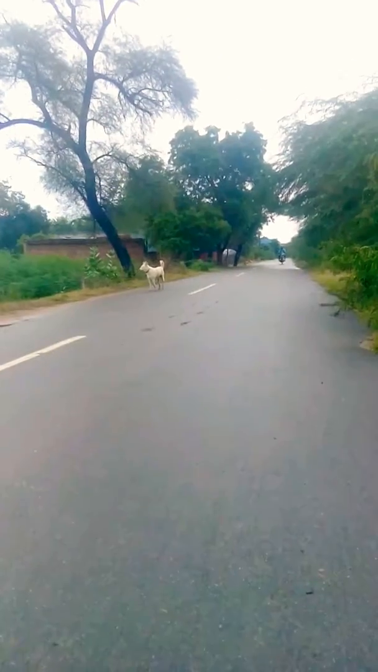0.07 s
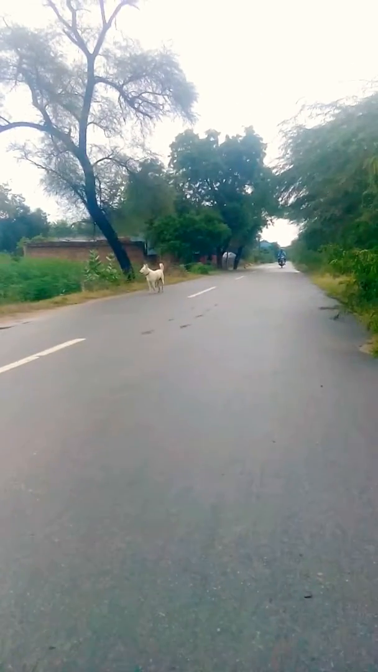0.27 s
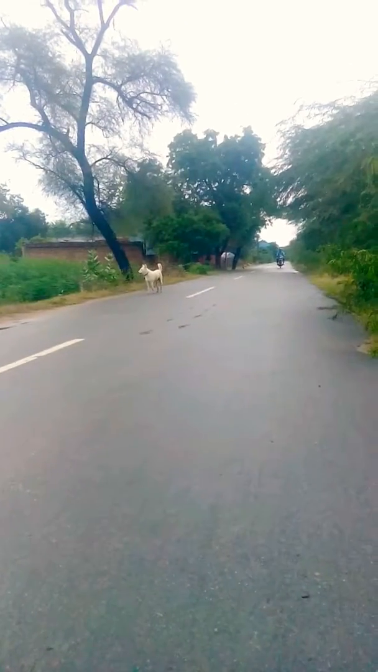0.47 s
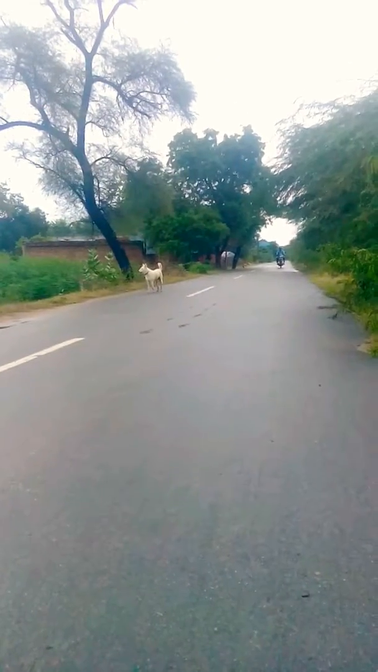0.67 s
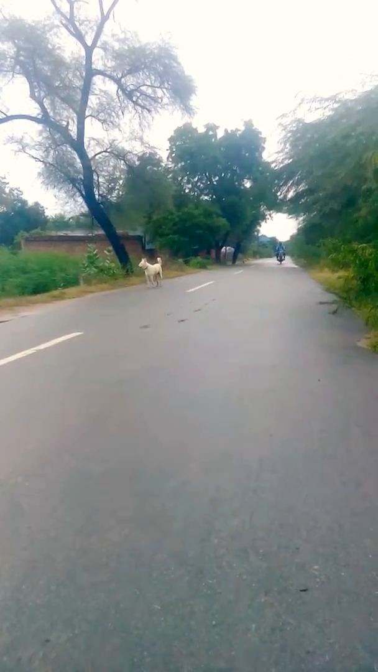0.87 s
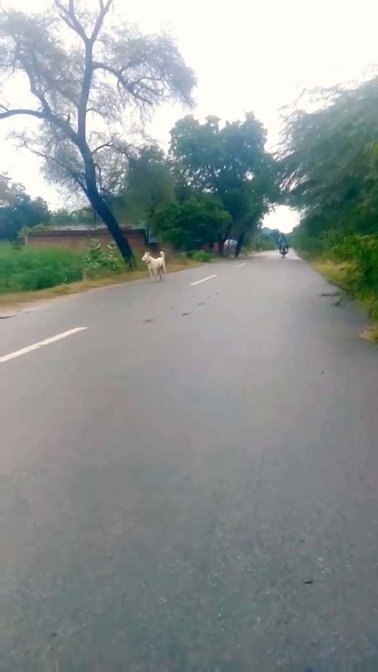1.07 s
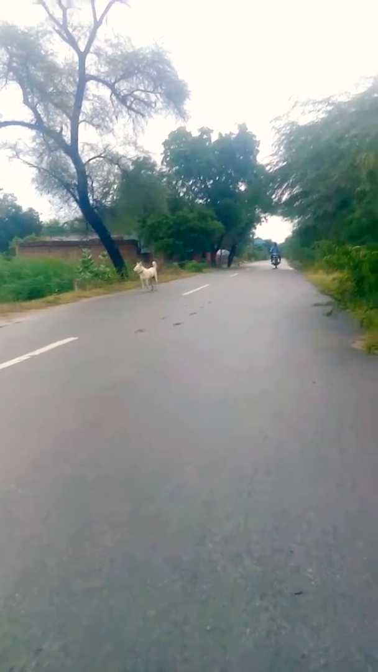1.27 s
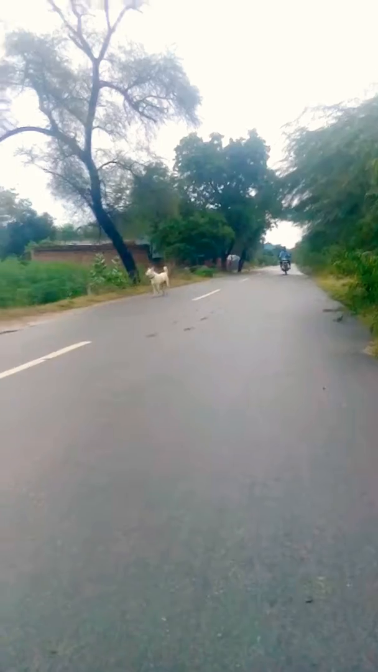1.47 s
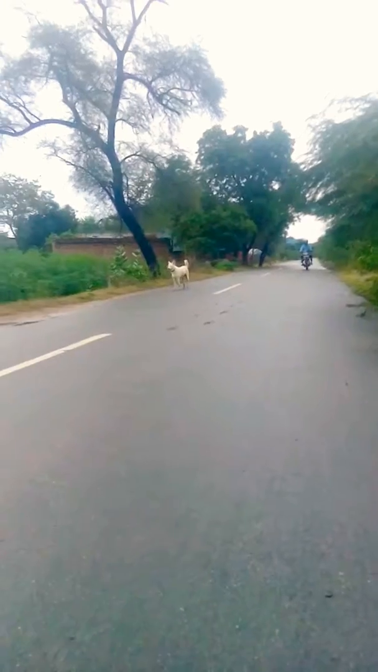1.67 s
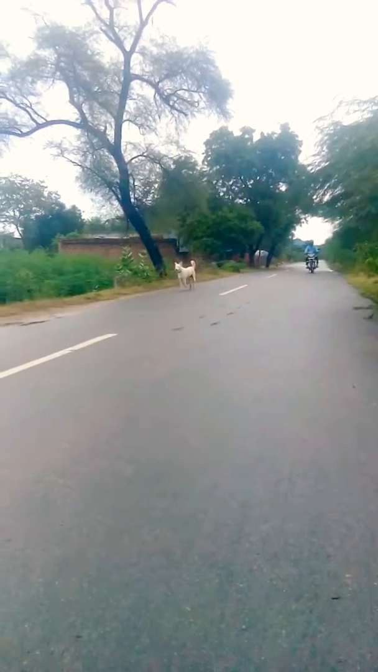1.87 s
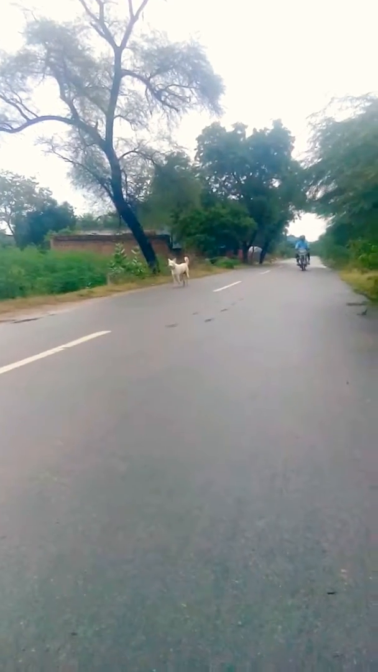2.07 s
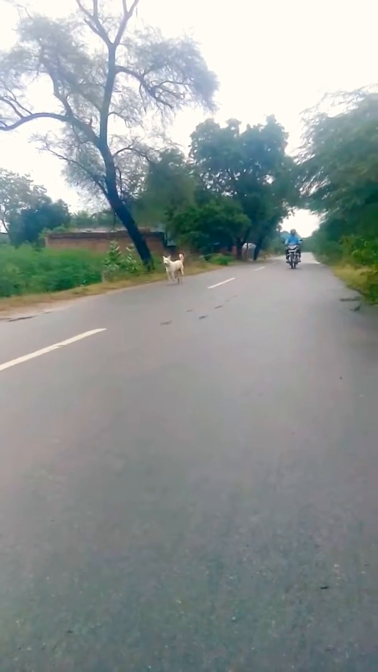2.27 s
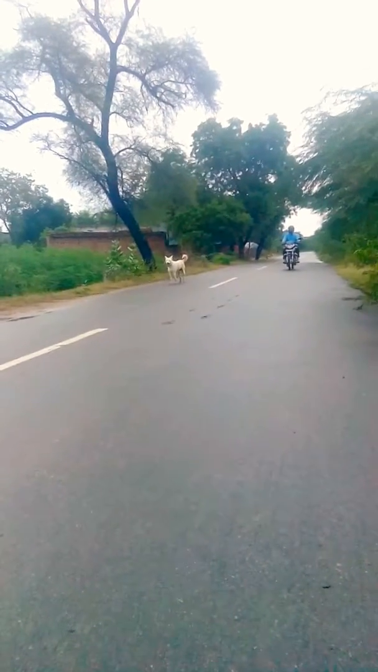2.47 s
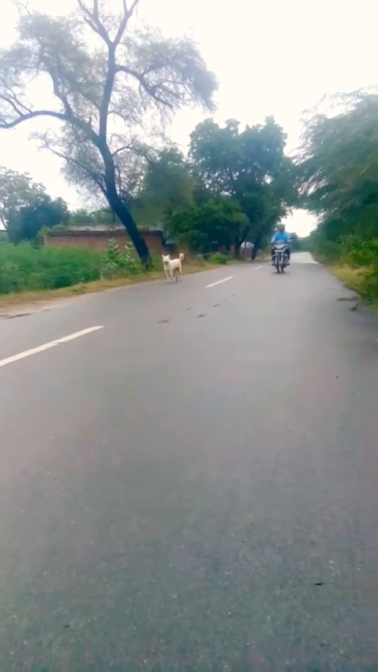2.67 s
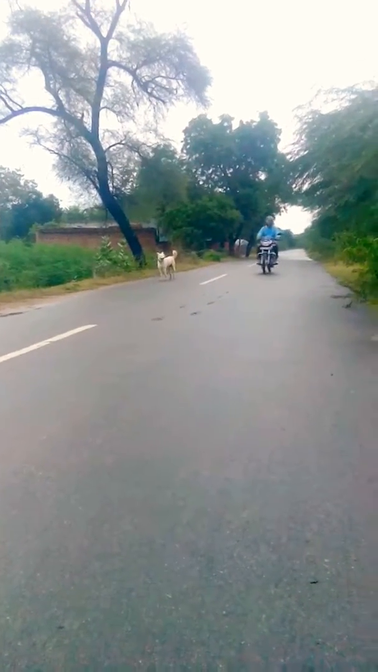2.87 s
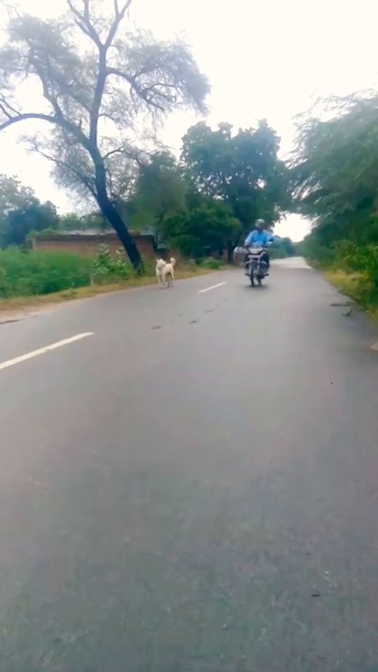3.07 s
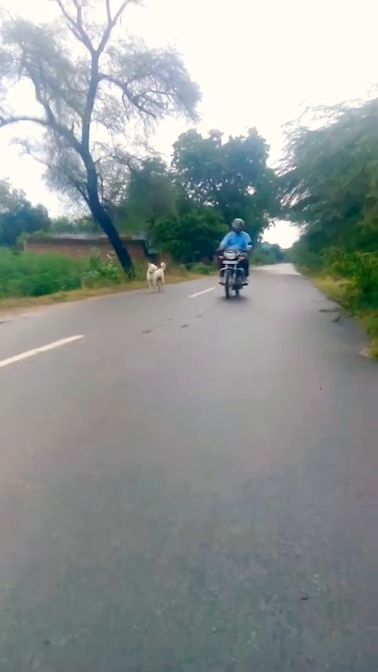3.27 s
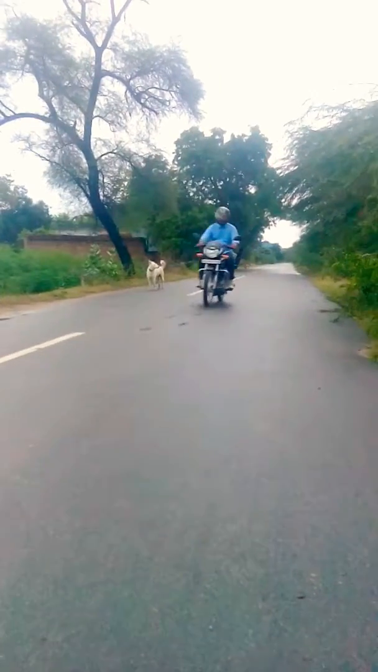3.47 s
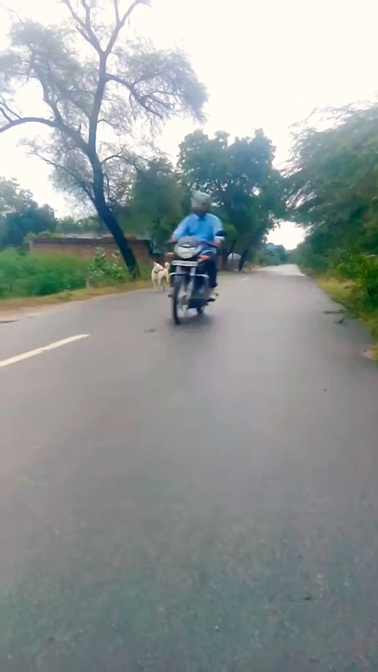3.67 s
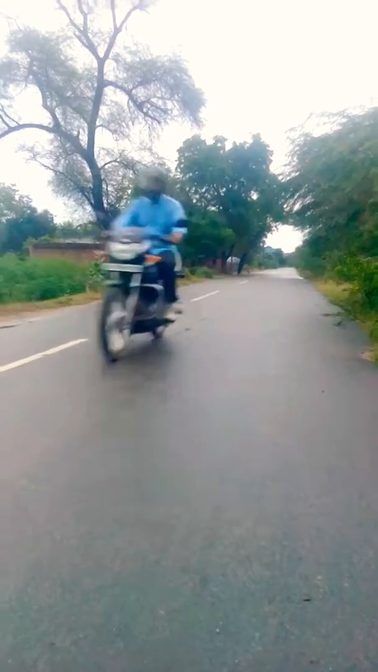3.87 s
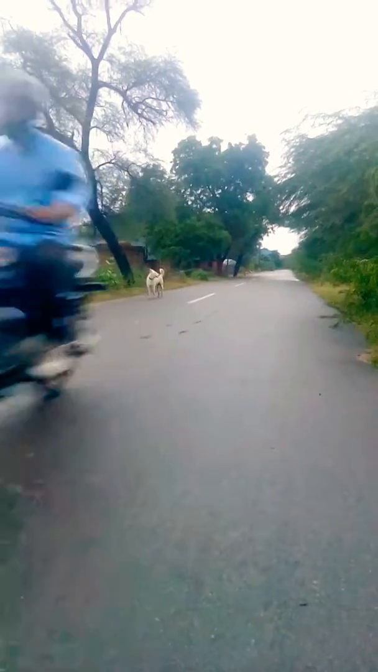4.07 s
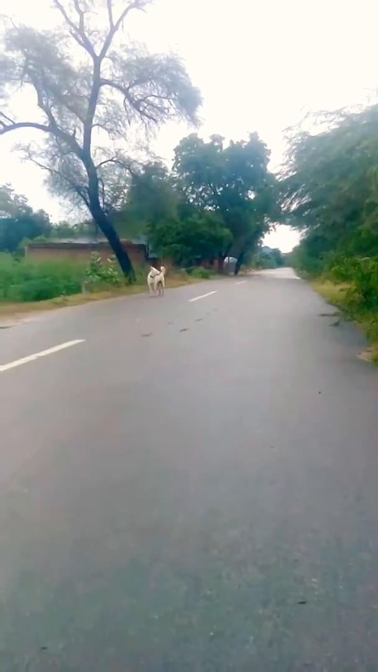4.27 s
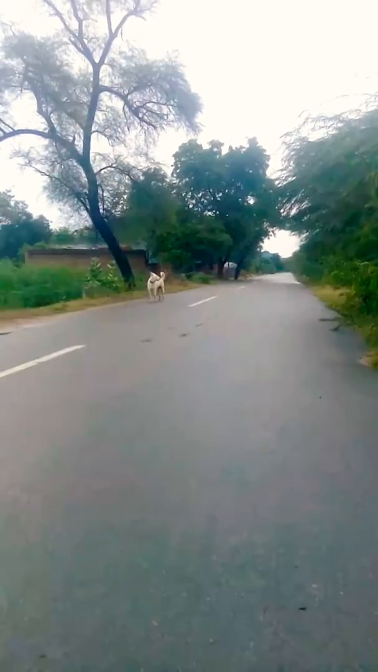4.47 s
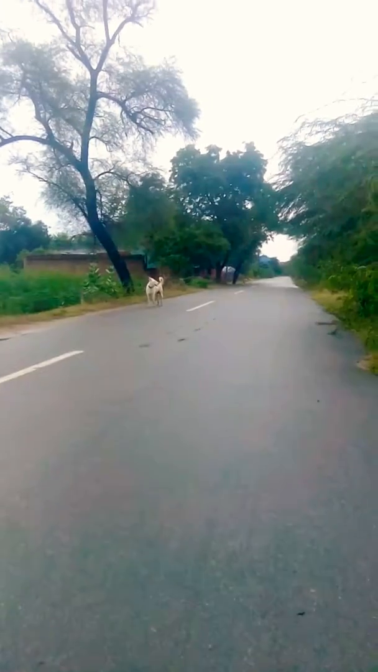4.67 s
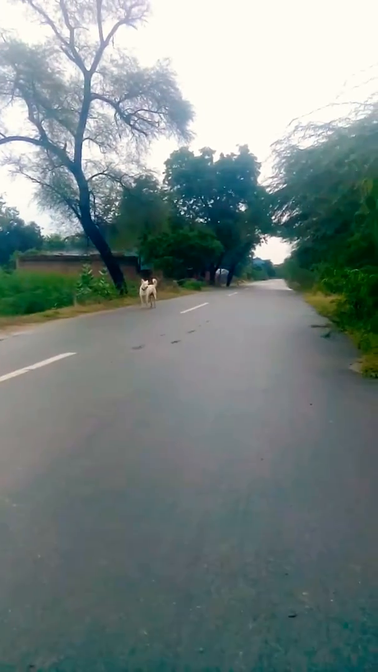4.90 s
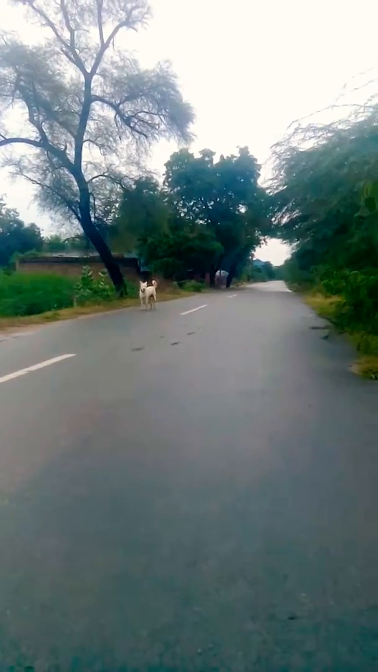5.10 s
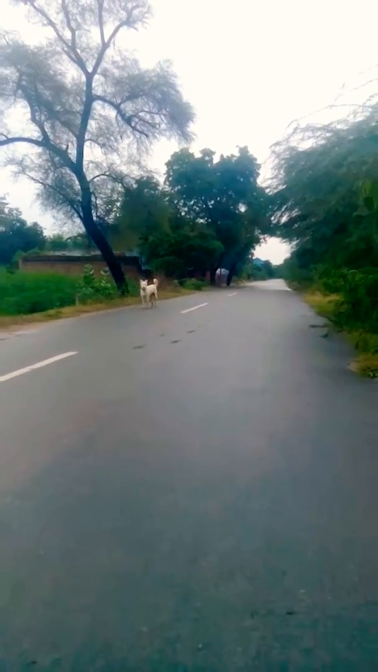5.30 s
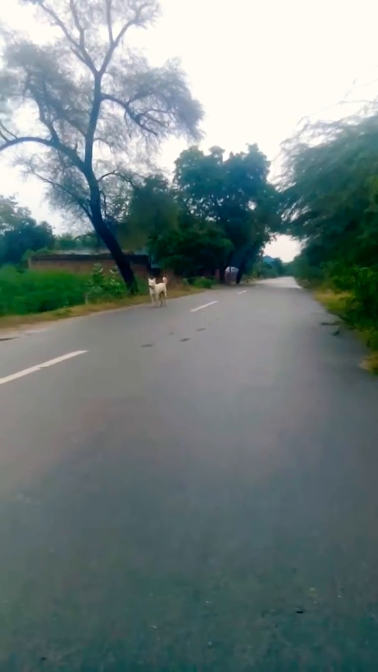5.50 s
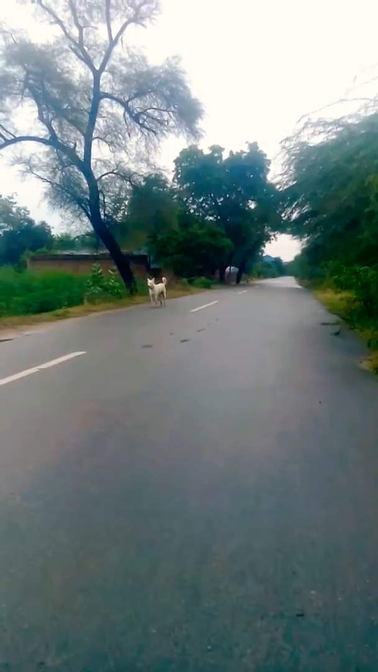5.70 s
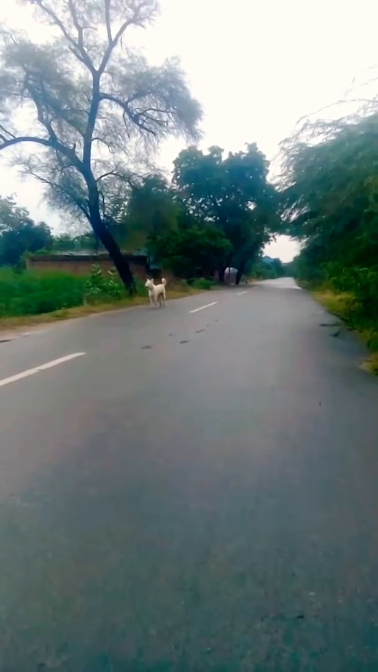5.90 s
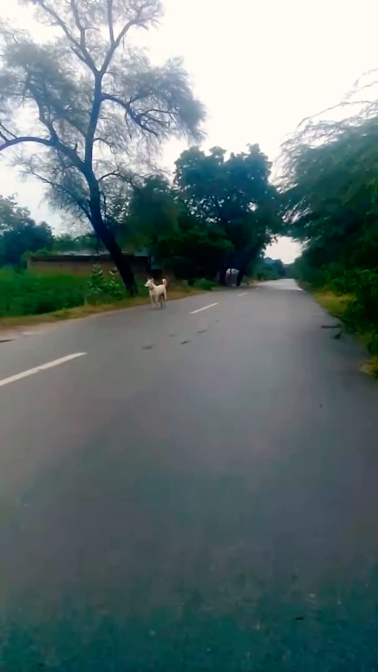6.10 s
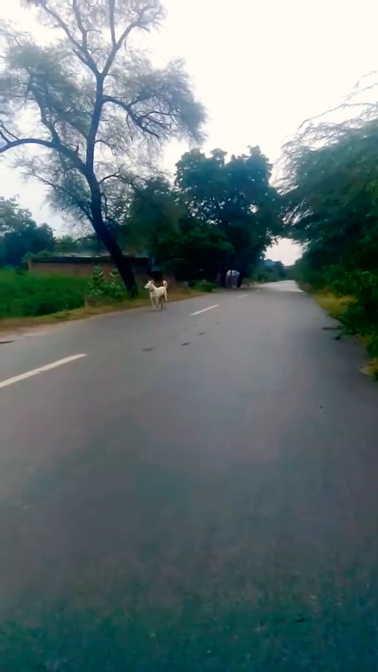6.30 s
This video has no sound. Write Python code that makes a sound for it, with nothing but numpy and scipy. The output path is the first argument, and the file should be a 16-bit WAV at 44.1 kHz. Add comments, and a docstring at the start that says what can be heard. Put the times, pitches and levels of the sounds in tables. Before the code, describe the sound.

A motorcycle putters up a quiet country road, passes close by and draws away, with small birds chirping faintly behind it.

```python
"""A motorcycle passes on a country road

A single-cylinder motorcycle rolls up, passes close by and draws away, easing off with one pop at the end.
Each firing sends a puff of gas that rings the exhaust pipes. Engine clatter and tyre roar change colour
as first the front, then the side, then the rear faces us. Behind it are leaves, insects and a breeze;
small birds in the hedges and a far dove sing in gliding pure tones."""
import sys
import numpy as np
from scipy import signal
from scipy.fft import rfft, irfft, next_fast_len
from scipy.io import wavfile

SR = 44100
rng = np.random.default_rng(int(sys.argv[2]) if len(sys.argv) > 2 else 0)


def pcm_store(signal):
    """Save signal as 16-bit PCM."""
    levels = np.round(np.clip(np.atleast_2d(signal), -1, 1) * 32767)
    wavfile.write(sys.argv[1], SR, levels.astype(np.int16).T)


N = 279770
SPEED_M_S, SOUND_M_S = 7.4, 343
PASS_S, NEAREST_M = 4.4797, 1.135   # when and how close the motorcycle passes
EASE_OFF_S, EASING_S = 5.82, .35   # when the throttle starts to close, and how long it takes


def from_db(db):
    """Turn decibels into a number to multiply by."""
    return 10 ** (np.asarray(db) / 20)


def rms_one(x):
    """Scale a sound so that its average strength (rms) is 1."""
    return x / np.sqrt(np.mean(x ** 2) + 1e-20)


def drift(per_s):
    """A wandering value: random points of spread 1, joined by straight lines."""
    points = rng.standard_normal(1000)
    return np.interp(np.arange(N) / SR * np.clip(per_s, .1, 150), np.arange(1000), points)


def resonate(x, hz, width_hz):
    """Make a sound ring at one pitch; a smaller width rings longer."""
    r = np.exp(-np.pi * width_hz / SR)
    feedback = [1, -2 * r * np.cos(2 * np.pi * hz / SR), r * r]
    return signal.lfilter([(1 - r * r) / 2, 0, (r * r - 1) / 2], feedback, x)


def coloured(spectrum):
    """Noise of strength 1, shaped by (f/Hz, level/dB) points and silent below the first."""
    size = next_fast_len(N)
    hz, db = np.transpose(spectrum)
    bin_hz = np.arange(size // 2 + 1) * SR / size
    gain = from_db(np.interp(np.log(bin_hz + 1), np.log(hz), db, left=-150))
    return rms_one(irfft(rfft(rng.standard_normal(size)) * gain, size)[:N])


def passage(behind_m=0):
    """Time, distance and viewing angle (degrees, 0 = head on) of a point on the moving motorcycle."""
    t = np.arange(N) / SR
    ahead_m = SPEED_M_S * (PASS_S - t) + behind_m
    return t, np.hypot(ahead_m, NEAREST_M), np.degrees(np.arctan2(NEAREST_M, ahead_m))


def beam(aim_deg, width_deg, db, far_db, coasting_db, behind_m=0):
    """Gain of a part that beams its sound like a torch: strongest when near and aimed at us."""
    t, metres, angle = passage(behind_m)
    far = np.clip((metres - 24.4) / 3.7 + .5, 0, 1)   # beyond about 24 m the sound is duller
    coasting = np.sqrt(np.clip((t - EASE_OFF_S) / EASING_S, 0, 1))   # sudden at first
    off_aim = np.abs((angle - aim_deg) / width_deg)
    beam_db = np.maximum(-6 * off_aim ** 3.24, -29.5)   # a little leaks round the back
    return from_db(db + beam_db + far_db * far + coasting_db * coasting) / metres


# The hiss of the fields: f/Hz, relative level/dB
FIELD_SPECTRUM = [(180, -39), (300, -29), (446, -16), (543, -3), (651, -11), (967, -2.5), (1720, -8),
                  (3120, -3.5), (4330, -8), (5920, -12), (6990, -54.5), (8950, -24), (15400, -144)]
def fields():
    """Leaves and insects make a soft hiss that wavers a little."""
    return from_db(-57.5 + 1.5 * drift(5.5)) * coloured(FIELD_SPECTRUM)


# The rumble of moving air: f/Hz, relative level/dB
WIND_SPECTRUM = [(8, -17.5), (27, 18), (42, -6), (60, -17), (90, -60)]
def wind(breeze_db=-79.5, draught_db=-46):
    """A faint breeze, plus the air the motorcycle pushes, which swells as it comes near."""
    metres = passage()[1]
    return (from_db(breeze_db) + from_db(draught_db) / metres) * coloured(WIND_SPECTRUM)


def sing(notes):
    """Each bird note is a pure tone gliding through three pitches; the hedges add two echoes."""
    song = np.zeros(N + SR)
    for s, length, start_hz, middle_hz, end_hz, db in notes:
        u = np.linspace(-1, 1, int(length * SR))   # from the note's start to its end
        hz = middle_hz + (end_hz - start_hz) / 2 * u + ((start_hz + end_hz) / 2 - middle_hz) * u ** 2
        fade = np.sqrt(2 - 2 * u ** 4)
        song[round(s * SR):][:len(u)] += from_db(db) * fade * np.sin(2 * np.pi * np.cumsum(hz) / SR)
    song[:N] *= from_db(4 * drift(140))   # leaves in the way make the notes scratchy
    echoes = 0.36 * np.roll(song, round(.017 * SR)) + 0.33 * np.roll(song, round(.037 * SR))
    return (song + echoes)[:N]


def far_chatter(count=120, db=-65):
    """Far birds, too many to tell apart: tiny chirps at random times and pitches."""
    notes = []
    for when, length, pitch, bend, fall, loud in rng.random((count, 6)):
        hz = 2200 * 2.1 ** pitch
        glide = hz, hz * (1 + 0.28 * bend), hz * (0.85 + 0.17 * fall)
        notes.append((when * N / SR, 0.0066 + 0.019 * length, *glide, db + 8 * (loud - .5)))
    return sing(notes)


# The dove's coos: t/s, length/s, level/dB
COOS = [(0, 0.25, -69.5), (.57, 0.13, -64), (1.35, 0.17, -60.5), (1.72, 0.33, -64.5), (2.449, .17, -61)]
def dove(glide_hz=(546, 543, 515)):
    """A far dove sings low notes that sag at the end."""
    return sing((s, length, *glide_hz, db) for s, length, db in COOS)


# Whistled notes: t/s, length/s, start f/Hz, middle f/Hz, end f/Hz, level/dB
WHISTLES = [(1.006, 0.033, 2230, 2200, 2060, -59), (1.3, 0.056, 2570, 2540, 2450, -62),
            (1.81, 0.078, 2780, 2460, 2380, -56.5), (2.071, .02, 2550, 2445, 2450, -54.5),
            (2.195, .02, 2830, 2840, 2700, -53), (2.37, 0.05, 2780, 2500, 2400, -60),
            (2.929, 0.072, 2740, 2450, 2340, -53), (6.034, 0.037, 2090, 2230, 1930, -52.5),
            (6.062, 0.044, 2050, 2150, 1790, -53.5), (6.115, 0.054, 2040, 2340, 1920, -57.5)]
def whistling_birds():
    """Small birds whistle short notes, each one smooth glide."""
    return sing(WHISTLES)


# Warbled phrases: t/s, length/s, first f/Hz, last f/Hz, swing/share of the pitch, level/dB
WARBLES = [(0.265, .017, 2650, 2660, .06, -55.5), (.282, 0.037, 4600, 2730, 0.082, -51),
           (0.334, 0.04, 4300, 2210, 0.124, -50), (0.426, 0.012, 5700, 5700, 0.032, -64),
           (0.497, .015, 5670, 5720, 0.048, -64), (0.838, .07, 2470, 2660, 0.13, -59),
           (1.555, .02, 5100, 5100, .07, -57), (1.843, .02, 5620, 5700, 0.043, -62),
           (2.43, .02, 5300, 5300, 0.074, -58), (2.465, 0.058, 2980, 3900, 0.091, -53),
           (2.578, 0.11, 3700, 3300, 0.19, -49), (2.696, .035, 3290, 3390, 0.053, -50.5),
           (2.87, .018, 3510, 3470, 0.046, -52.5), (5.494, .145, 3700, 3680, 0.092, -48.5),
           (5.893, .025, 3580, 3600, .04, -53), (5.956, 0.033, 3620, 3500, 0.091, -52),
           (6.072, 0.052, 4780, 5400, .09, -62), (6.095, .055, 3530, 3280, 0.11, -57.5),
           (6.287, .05, 3220, 2960, 0.14, -53)]
def warbling_birds(step_s=.0135):
    """Each phrase is a ragged run of quick notes; most arch up in pitch, some dip."""
    notes = []
    for s, length, first_hz, last_hz, swing, db in WARBLES:
        draws = rng.uniform(-1, 1, (16, 5))[:int(np.ceil(length / step_s))]
        for k, (pitch, lean, arch, stretch, loud) in enumerate(draws):
            hz = first_hz + (last_hz - first_hz) * k * step_s / length
            hz *= 1 + 0.96 * swing * pitch
            tilt, bend = 0.82 * swing * lean, swing * np.sign(arch + .4)
            glide = hz * (1 - bend - tilt), hz * (1 + bend), hz * (1 - bend + tilt)
            notes.append((s + k * step_s, (1.13 + .4 * stretch) * step_s, *glide, db + loud))
    return sing(notes)


# Dry ticks: t/s, level before filtering/dB
DRY_TICKS = [(2.784, -54), (5.544, -56)]
def ticks():
    """Each tick is a tiny burst of bright noise."""
    out, t = np.zeros(N), np.arange(round(.03 * SR)) / SR
    for s, db in DRY_TICKS:
        out[round(s * SR):][:len(t)] += from_db(db) * np.exp(-t / 0.00067) * rng.standard_normal(len(t))
    return resonate(out, hz=5500, width_hz=4000)


# Pings from the engine: t/s, f/Hz, time to fade by 60 dB/s, peak level/dB
METAL_PINGS = [(3.45, 4300, .04, -42), (3.712, 4150, .04, -36), (4.3096, 3500, .014, -10),
               (4.578, 4050, .04, -16)]
def pings():
    """Engine metal rings with a pure tone that starts fast and dies away."""
    out, t = np.zeros(N), np.arange(round(.03 * SR)) / SR
    for s, hz, fade_s, db in METAL_PINGS:
        level = from_db(db - 60 * t / fade_s) * np.minimum(t / .0004, 1)
        out[round(s * SR):][:len(t)] += level * np.sin(2 * np.pi * hz * t)
    return out


def backfire(at_s=6.2495, db=-24):
    """One sharp exhaust pop: a short dip in air pressure between two crests."""
    u = (np.arange(N) / SR - at_s - .003) / .0011
    return from_db(db) * (u ** 2 - 1) * np.exp(-u ** 2 / 2)


# Engine speed: t/s at the motorcycle, firing rate f/Hz
FIRING_RATE = [(-0.2, 39.22), (0.5, 37.67), (1.0, 36.87), (1.25, 37.46), (1.75, 36.42), (2.4, 35.65),
               (2.8, 35.69), (3.4, 34.78), (4.2, 34.74), (4.55, 35.28), (4.9, 34.46), (5.4, 35.09),
               (5.75, 35.04), (6.1, 33.79), (6.5, 32.69)]
def firing_cycles():
    """Count engine cycles as they reach us; the travel time shrinks, then grows, so the pitch drops."""
    t, metres, _ = passage()
    sent_s = t - metres / SOUND_M_S
    firing_hz = np.interp(sent_s, *np.transpose(FIRING_RATE))
    return .24 + np.cumsum(firing_hz * np.gradient(sent_s))   # starts partway through a cycle


def valve(cycles, hz=4170, fade_s=0.017):
    """A valve taps shut twice a cycle with uneven force, so now and then it rings out."""
    taps = np.diff(np.floor(2 * cycles + 0.37), prepend=0) * from_db(5 * drift(70))
    r = from_db(-60 / (fade_s * SR))
    ring = signal.lfilter([.7], [1, -2 * r * np.cos(2 * np.pi * hz / SR), r * r], taps + 1e-18)
    return resonate(resonate(ring, hz, width_hz=700), hz, width_hz=900)


def clatter(cycles, spectrum, rings, ring_db, throb):
    """Roar plus ringing metal; each ring flickers on its own and all swell with each firing."""
    roar = coloured(spectrum)
    shaking = signal.sosfilt(signal.butter(4, 6800, fs=SR, output="sos"), rng.standard_normal(N))
    for hz, width_hz, db in rings:
        ring = rms_one(resonate(resonate(shaking, hz, width_hz), hz, 1.33 * width_hz))
        roar += from_db(db + ring_db + 3.1 * drift(14)) * ring
    swell = 1 + throb * np.cos(2 * np.pi * (cycles - .2))
    return rms_one(roar) * from_db(1.14 * drift(9.7)) * swell


# Engine and tyre roar from four sides (fore and aft are the flanks), and hiss: f/Hz, relative level/dB
FRONT_ROAR = [(240, 10), (400, -10.5), (1000, -0.5), (1180, -13), (1470, -4), (2110, -8.5), (2390, -5.5),
              (4210, -10), (4750, -18.5), (5540, -14.5), (15400, -68.5)]
FORE_ROAR = [(240, -49), (400, -2), (615, -10), (983, 5), (1150, -3.5), (1450, 7.5), (1890, -12), (2750, 7),
             (3430, -2.5), (5630, -5.5), (9000, -36), (11700, -77), (19800, -120)]
AFT_ROAR = [(240, -28.5), (400, -5.5), (615, -8.5), (874, -6), (983, -2), (1720, -6.5), (2580, -3),
            (3340, -7.5), (4120, -3), (6330, -13), (7600, -30), (9000, -33.5), (11700, -47), (19800, -120)]
REAR_ROAR = [(240, -22), (400, -3), (833, -8.5), (1260, -27), (1610, -35), (2180, -10), (3240, -45),
             (3900, -9), (6450, -22), (7990, -53), (8900, -39.5), (10500, -58), (15400, -75.5)]
CLOSE_HISS = [(6000, -24), (8000, -5.5), (10900, -1), (13000, -6), (15500, -5), (17000, -42)]
# Ringing fins and covers on each side: f/Hz, width/Hz, relative level/dB
FRONT_METAL = [(890, 1600, -14), (1448, 62, -2), (1957, 24, -8), (2663, 240, -2), (4045, 180, -2.5),
               (5370, 300, -13), (6330, 120, -17.5)]
FORE_METAL = [(977.4, 45, -2.5), (1272, 9.9, 0), (2710, 110, 1), (3133, 48, -3.5), (3320, 33, -6.5),
              (4170, 23, -32), (4750, 59, -15)]
AFT_METAL = [(983, 35, -3), (1249, 120, -0.5), (1934, 120, -9.5), (2660, 42, -5.5), (3870, 320, -4.5),
             (4790, 36, -11)]
REAR_METAL = [(607, 167, 7.5), (933, 11.6, 2), (1267, 160, 3.5), (2180, 150, -1), (3790, 180, -10)]
# Beams of the four sides and the hiss: aim/degrees from head on, angle to fall by 6 dB/degrees,
# level at 1 m/dB, change far off/dB, change with the throttle closed/dB
ENGINE_BEAMS = [(0, 35.6, -24.5, -4.5, 0), (51.3, 26.3, -20.5, 5, 0), (107.84, 46.2, -16.5, -7, 1),
                (181, 22, -29.5, 0, -1), (69.4, 46, -52, 5, 0)]
def engine(cycles):
    """Four sides clatter at us in turn, the valve is heard from all, and a hiss only close up."""
    front, fore, aft, rear, near = [beam(*side) for side in ENGINE_BEAMS]
    return (front * clatter(cycles, FRONT_ROAR, FRONT_METAL, ring_db=-11.5, throb=0.12)
            + fore * clatter(cycles, FORE_ROAR, FORE_METAL, ring_db=-7, throb=0.027)
            + aft * clatter(cycles, AFT_ROAR, AFT_METAL, ring_db=-9.5, throb=0.19)
            + rear * clatter(cycles, REAR_ROAR, REAR_METAL, ring_db=-8.5, throb=0.1)
            + near * from_db(1.5 * drift(12)) * coloured(CLOSE_HISS)
            + (front + fore + aft + rear) * from_db(-6.5) * valve(cycles))


def firings(cycles, jitter_cycles=0.0028):
    """One click per cycle, a little early or late; their strength turns ragged off the throttle."""
    timing, strength = rng.standard_normal((int(cycles[-1]) + 1, 2)).T
    at = np.searchsorted(cycles, np.arange(len(timing)) + jitter_cycles * timing)
    uneven_db = np.where(at / SR < EASE_OFF_S, 0.5, 3.5)
    clicks = np.full(N + 1, 1e-18)
    clicks[at[1:]] = from_db(uneven_db * strength)[1:]
    return clicks[:N]


def pipe(puffs, first_hz, first_width, second_hz, second_width, delay_s):
    """One part of the exhaust: the puffs ring two resonances in a row."""
    ring = resonate(resonate(puffs, first_hz, first_width), second_hz, second_width)
    return np.roll(rms_one(ring), round(delay_s * SR))


# How each exhaust part rings: first f/Hz, width/Hz, second f/Hz, width/Hz, delay/s
HEADER_RING = (165, 25, 219, 51, -.0018)
TAILPIPE_RING = (200, 52, 232, 183, -.0001)
SILENCER_RING = (128, 125, 128, 125, -.0008)
BOOM_RING = (200, 48, 150, 49, 0)
# Higher rings of the pipes: f/Hz, width/Hz, level against the main ring/dB
PIPE_OVERTONES = [(449, 110, -18), (654, 380, -31), (314, 54, -26.5)]
# Exhaust sound scattered by trees: f/Hz, relative level/dB
TREE_RUMBLE = [(40, -38), (60, -5.5), (100, -7.5), (200, -4), (330, -14.5), (500, -23), (800, -73.5)]
# Beams of the far boom, header (front pipe), tailpipe, silencer and hum: columns as in ENGINE_BEAMS
EXHAUST_BEAMS = [(0, 145, -45, 23, 1), (69, 72.5, -18, -14.5, -2), (180, 95, -16, -15, -21),
                 (183, 72, -24, 22, 1.5), (90, 188, -29.5, -2, -13)]
def exhaust(cycles):
    """Gas puffs ring the pipes: the header is heard from ahead, the tailpipe from behind."""
    boom, header, tail, silencer, hum = [beam(*part, behind_m=0.25) for part in EXHAUST_BEAMS]
    metres = passage()[1]
    clicks = firings(cycles)
    puffs = signal.sosfilt(signal.butter(2, 450, fs=SR, output="sos"), clicks)
    overtones = sum(from_db(db) * pipe(clicks, hz, width, hz, width, delay_s=0.0039)
                    for hz, width, db in PIPE_OVERTONES)
    rumble = from_db(-38) / metres ** 0.58 * coloured(TREE_RUMBLE)   # fades slowly with distance
    waver_db = 2 * drift(25) + 0.21 * metres * drift(7)
    crank = from_db(waver_db) * np.sin(4 * np.pi * cycles + 4.9)   # the engine turns twice per firing
    return (tail * (pipe(puffs, *TAILPIPE_RING) + overtones)
            + silencer * pipe(puffs, *SILENCER_RING)
            - header * (pipe(puffs, *HEADER_RING) + 1.05 * overtones)
            + boom * pipe(puffs, *BOOM_RING)   # only the low ring carries far
            + hum * crank + rumble)


def scene():
    """The countryside and the motorcycle, added up at one microphone."""
    cycles = firing_cycles()
    motorcycle = exhaust(cycles) + engine(cycles) + pings() + backfire()
    birds = far_chatter() + dove() + whistling_birds() + warbling_birds()
    return (fields() + wind() + birds + ticks() + motorcycle)[None]


def record(dry, cutoff_hz=15480):
    """Cut away the very highest treble."""
    return signal.sosfilt(signal.ellip(10, .5, 70, cutoff_hz, fs=SR, output="sos"), dry)


dry = scene()
out = record(dry)
pcm_store(out)
```